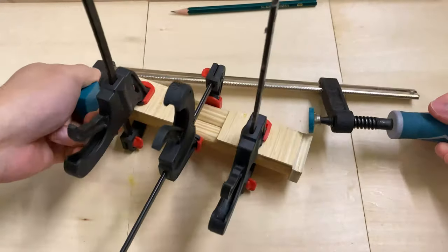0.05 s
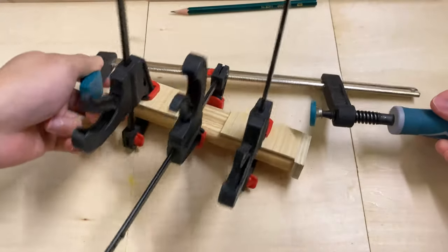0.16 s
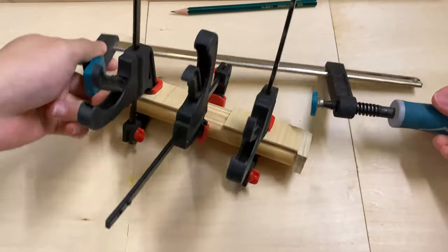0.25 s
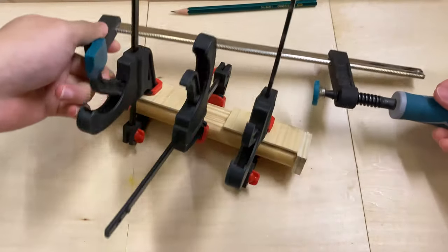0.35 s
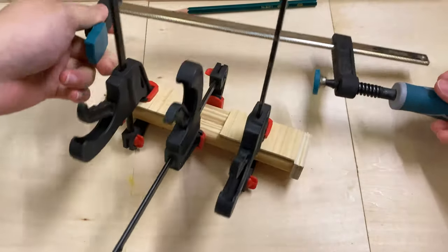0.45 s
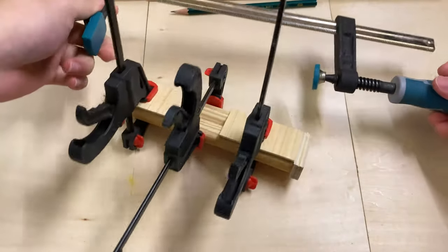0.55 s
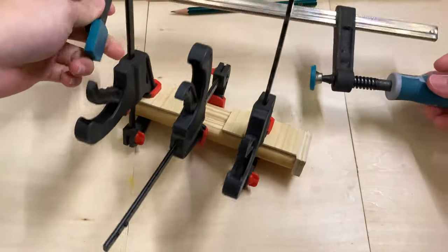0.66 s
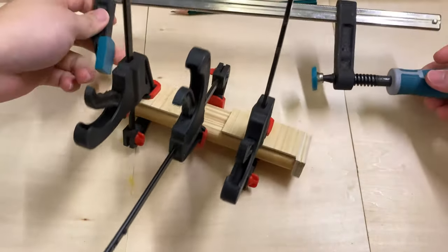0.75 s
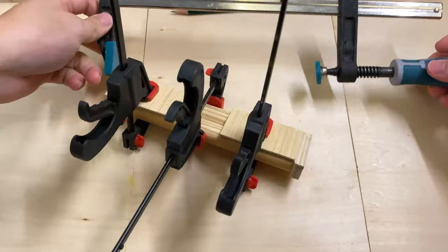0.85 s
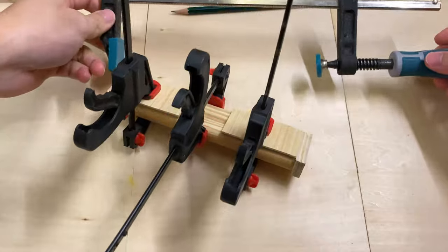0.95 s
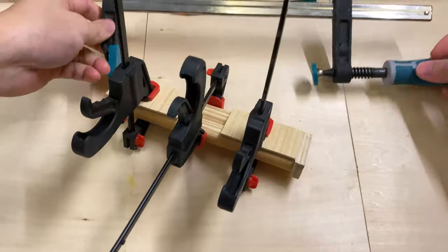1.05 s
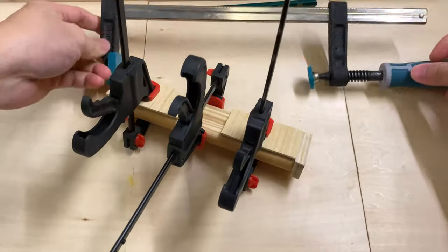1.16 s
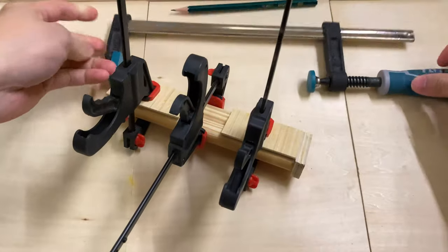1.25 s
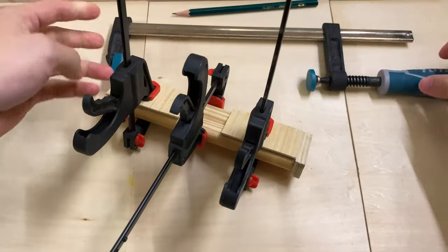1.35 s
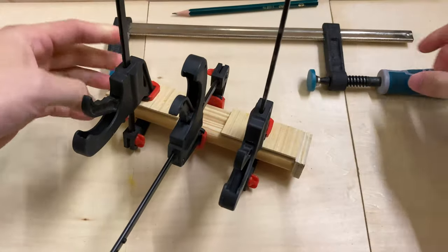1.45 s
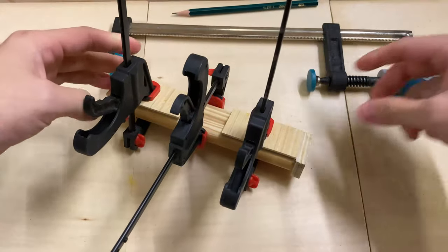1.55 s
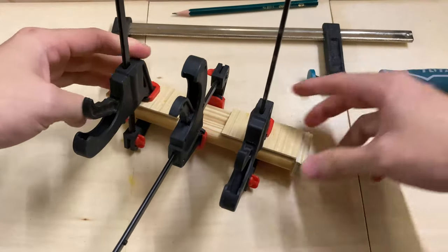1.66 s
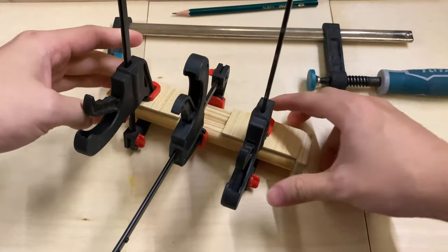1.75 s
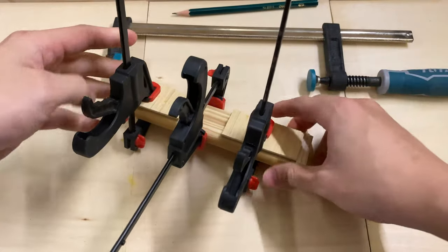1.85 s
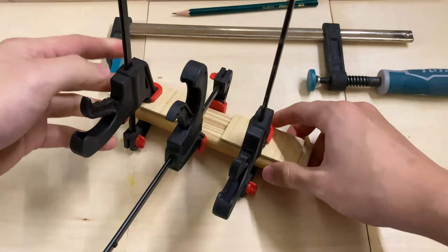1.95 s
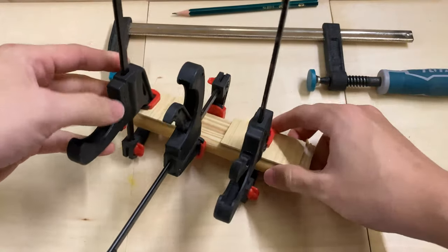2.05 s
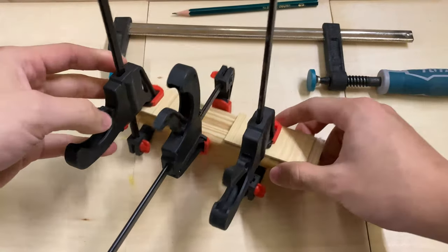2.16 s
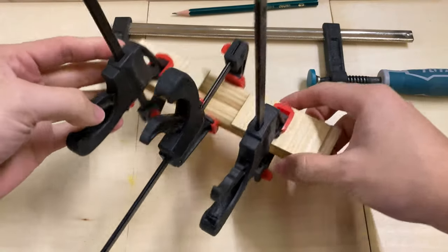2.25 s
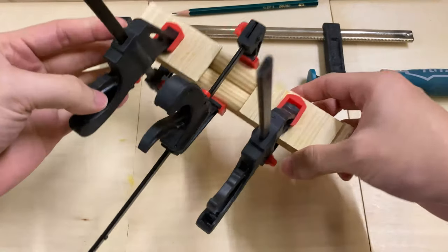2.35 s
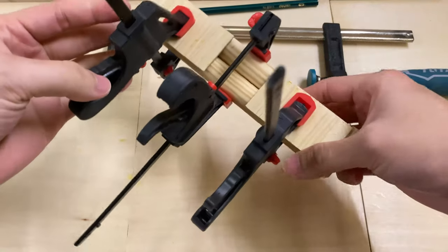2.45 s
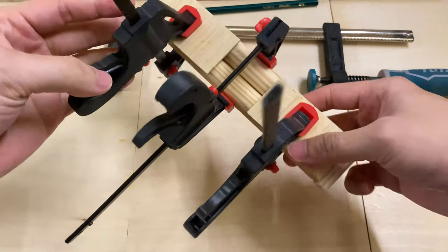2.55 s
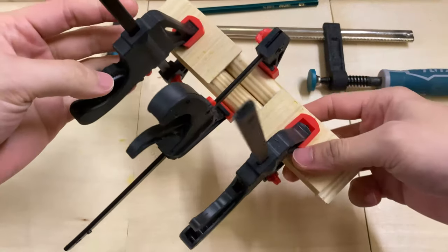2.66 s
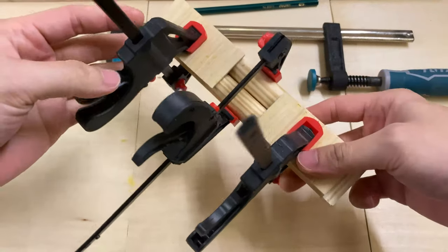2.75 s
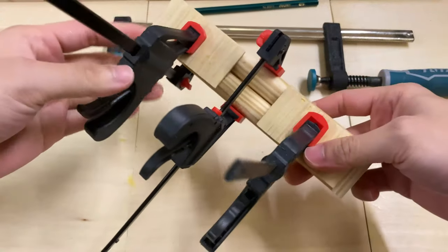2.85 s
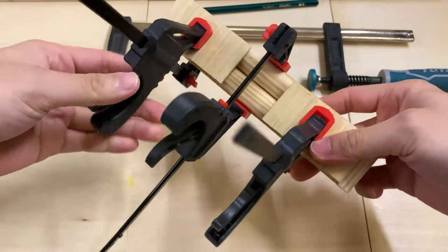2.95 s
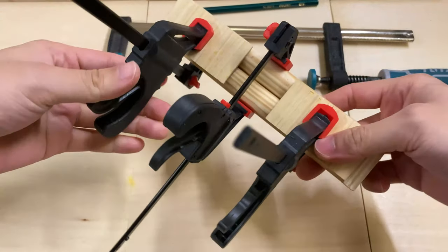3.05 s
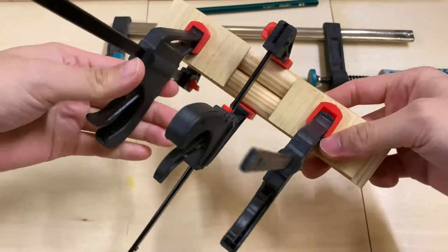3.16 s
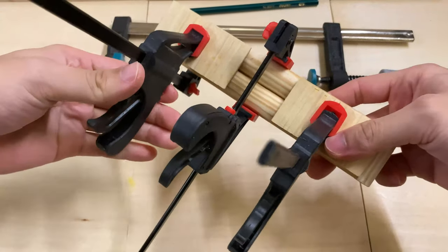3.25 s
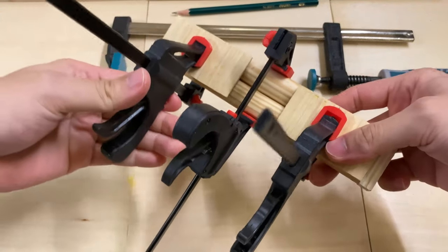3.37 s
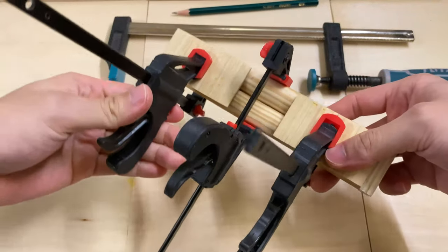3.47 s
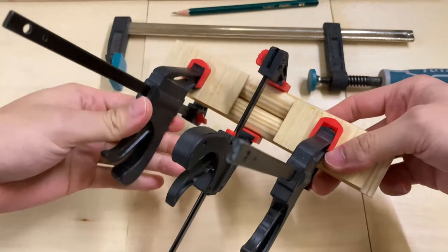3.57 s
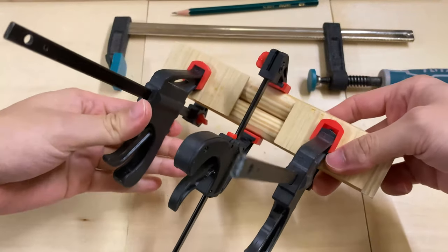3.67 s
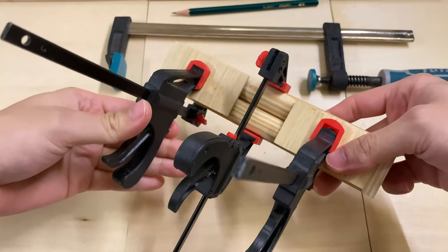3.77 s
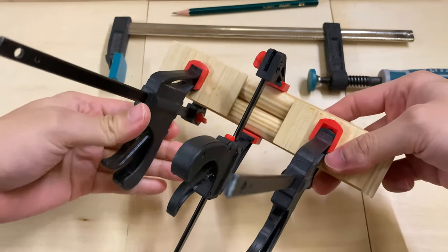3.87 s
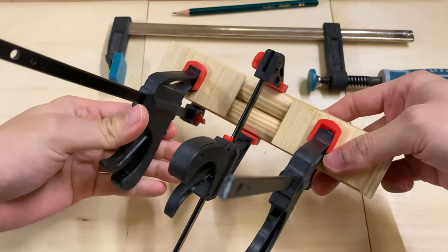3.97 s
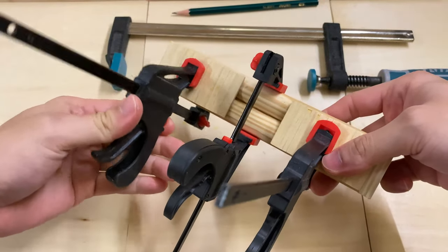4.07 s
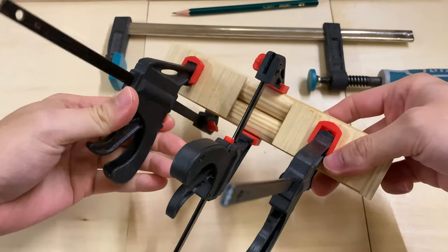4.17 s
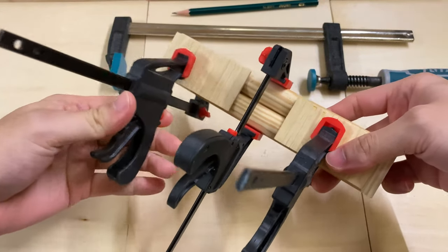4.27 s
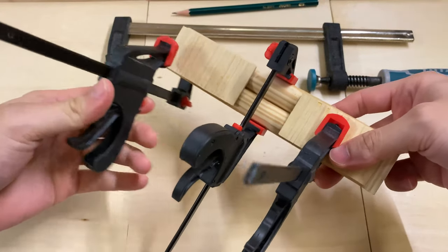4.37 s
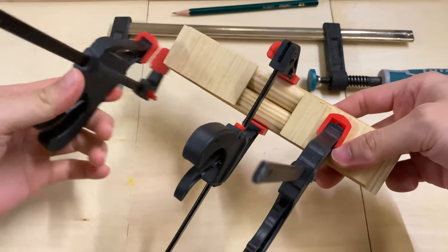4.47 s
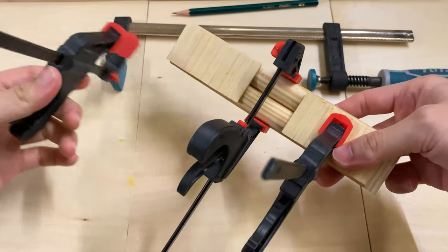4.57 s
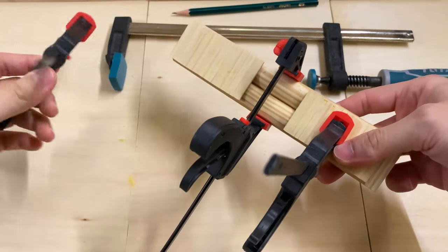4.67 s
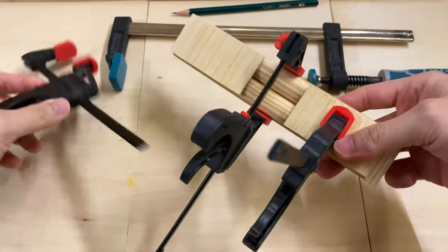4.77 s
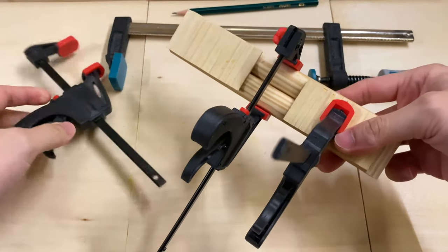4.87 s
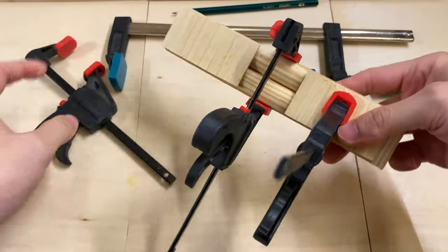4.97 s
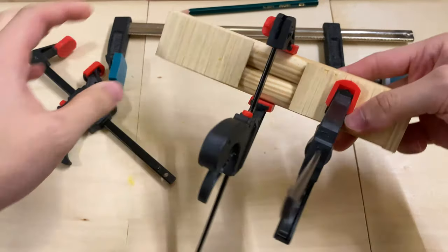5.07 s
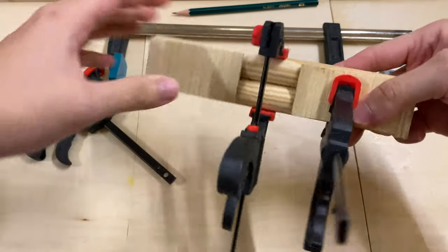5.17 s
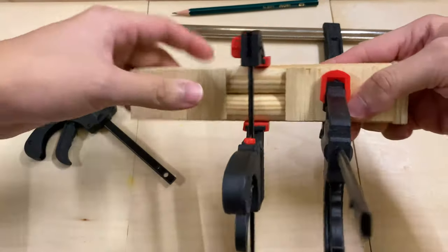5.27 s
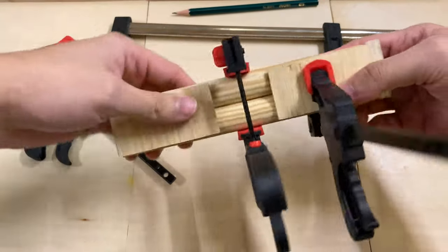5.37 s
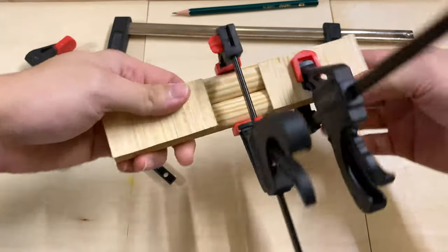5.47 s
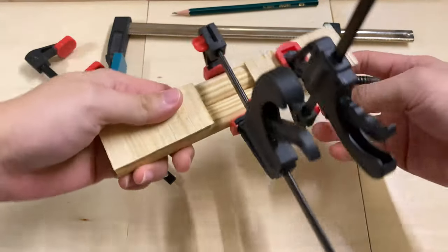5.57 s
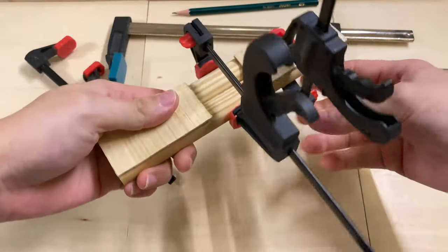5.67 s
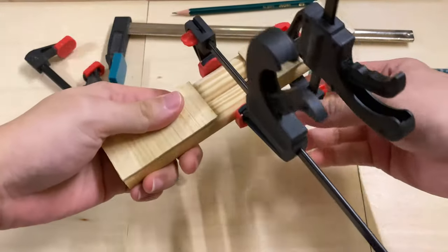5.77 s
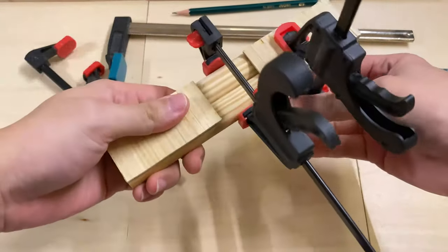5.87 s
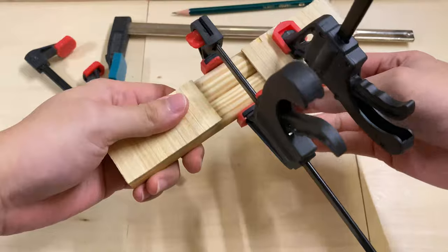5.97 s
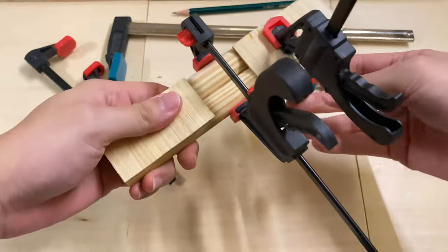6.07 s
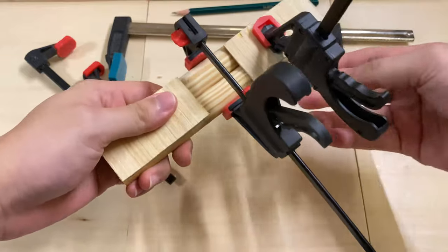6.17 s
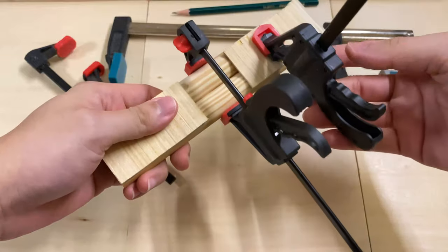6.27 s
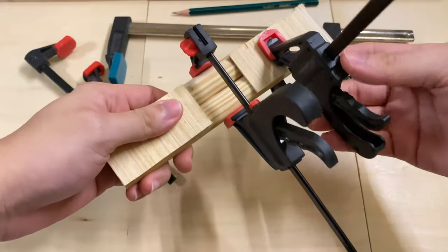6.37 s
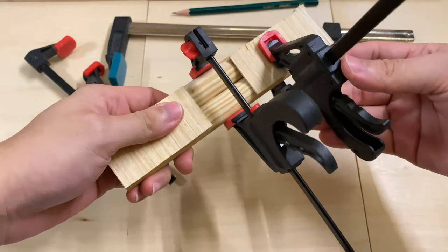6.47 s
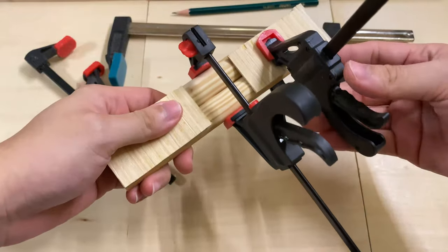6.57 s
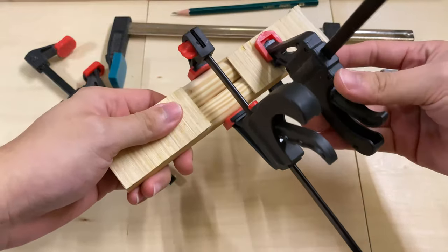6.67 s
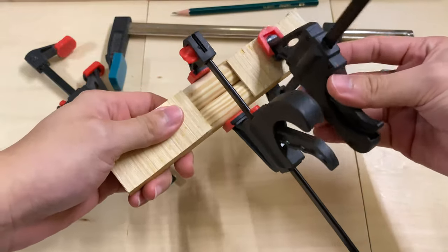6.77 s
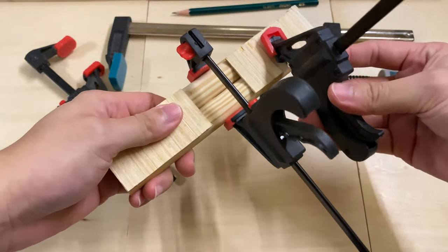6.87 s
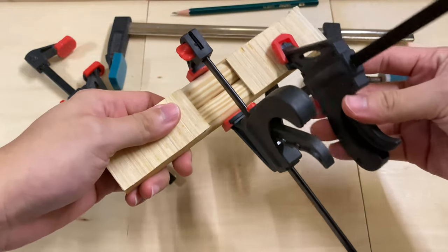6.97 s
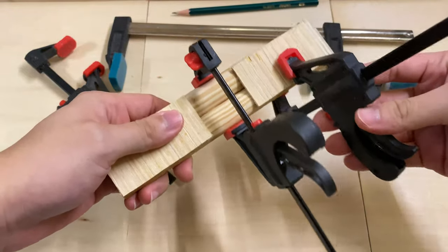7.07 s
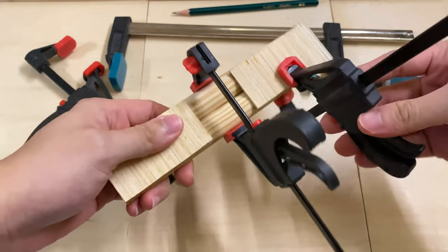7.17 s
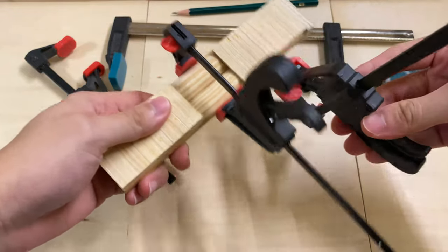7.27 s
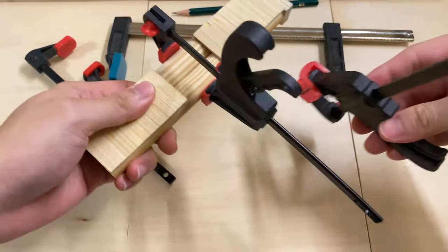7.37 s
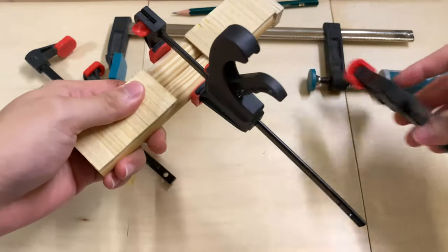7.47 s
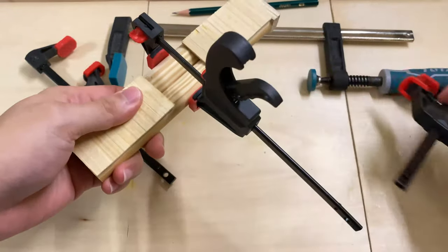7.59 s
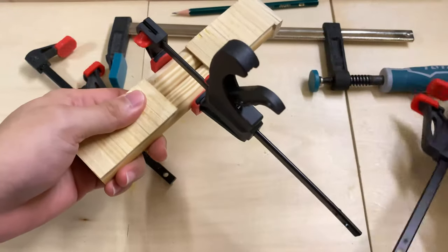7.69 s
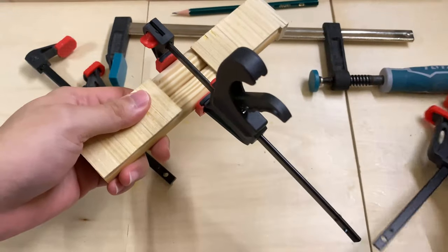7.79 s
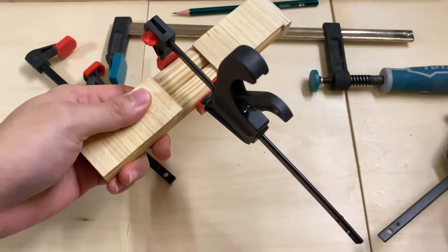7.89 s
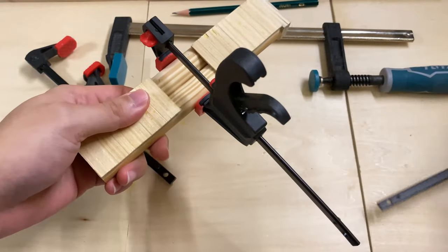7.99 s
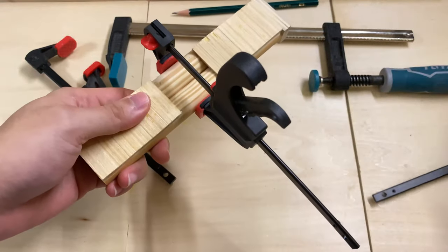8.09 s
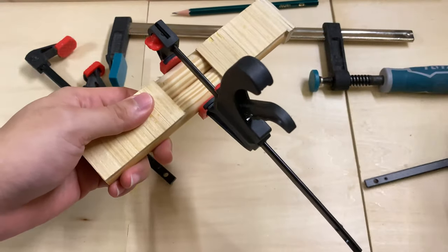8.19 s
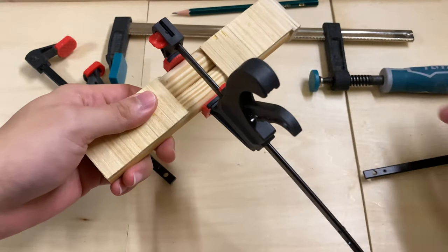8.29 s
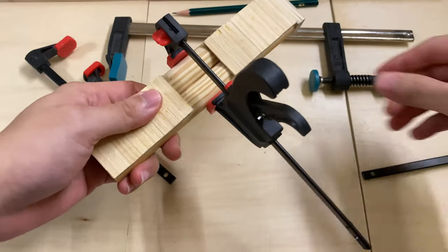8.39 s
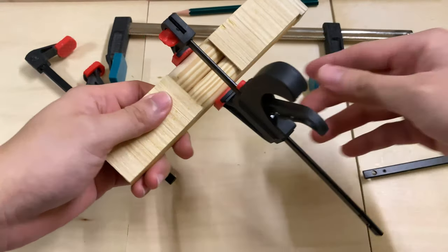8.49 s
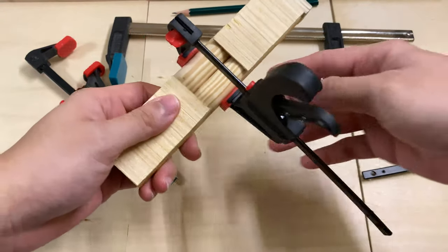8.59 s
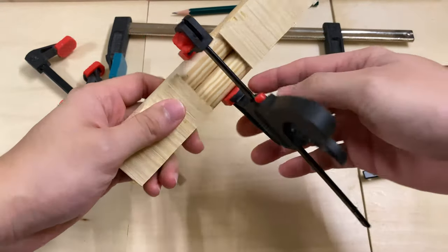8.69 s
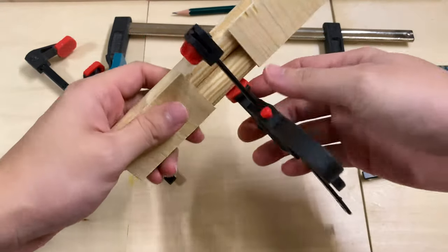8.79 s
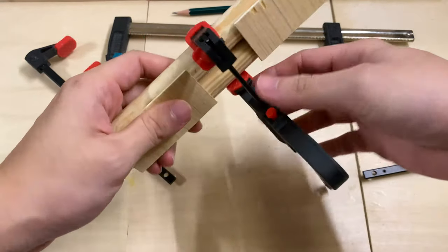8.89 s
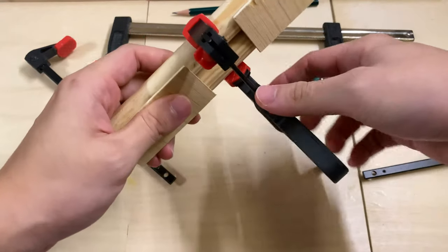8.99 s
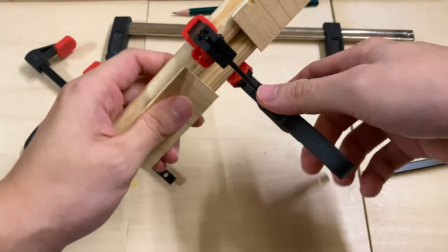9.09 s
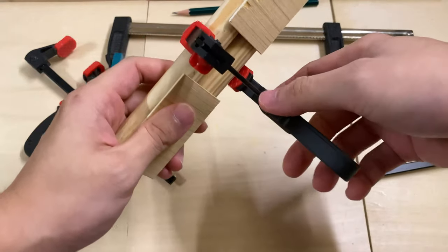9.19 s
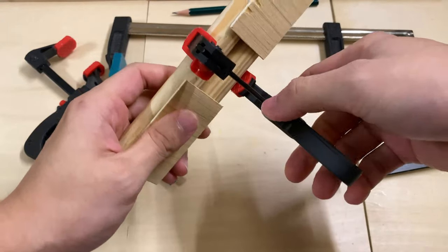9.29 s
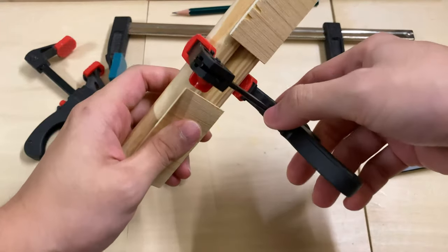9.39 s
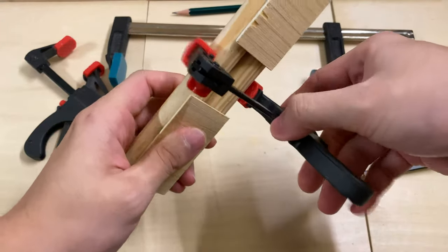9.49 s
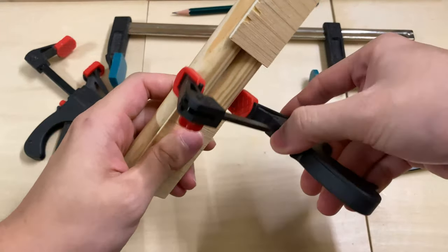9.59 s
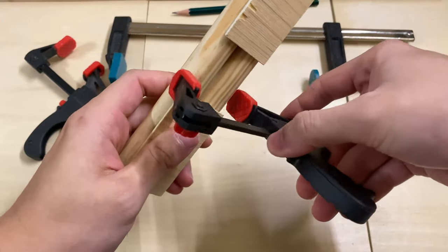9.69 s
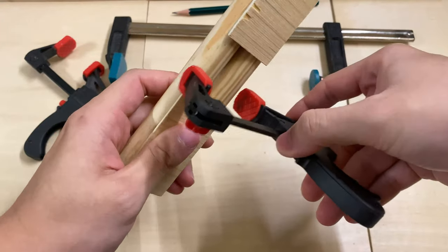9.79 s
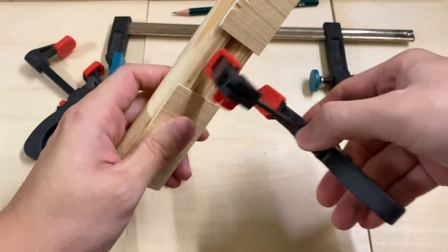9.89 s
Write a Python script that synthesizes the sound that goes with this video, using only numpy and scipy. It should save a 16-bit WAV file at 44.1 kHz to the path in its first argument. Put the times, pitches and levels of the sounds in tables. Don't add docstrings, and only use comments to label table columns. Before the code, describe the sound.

Plastic bar clamps click, creak and clatter onto a wooden bench, a steel bar rings briefly, with faint finger rubbing in a quiet small workshop.

```python
import sys
import numpy as np
from scipy import signal
from scipy.fft import rfft, irfft, next_fast_len
from scipy.io import wavfile

SR = 44100
rng = np.random.default_rng(int(sys.argv[2]) if len(sys.argv) > 2 else 0)


def master_out(mix):
    frames = np.transpose(np.atleast_2d(mix))
    ceiling = np.clip(frames, -1, 1)
    pcm = np.round(ceiling * 32767).astype(np.int16)
    wavfile.write(sys.argv[1], SR, pcm)


def convert_level_to_amplitude(level_db):
    exponent = np.asarray(level_db, float) / 20
    return 10 ** exponent


N = 438354
TIME = np.arange(N) / SR
SIZE = next_fast_len(N + SR)
BINS = np.arange(SIZE // 2 + 1) * SR / SIZE + .01
HIT = 4000

# (multiple of the pitch [-], level [dB], t60 [s])
SHELL_MODES = [(.55, -10, .008), (.7, -8, .010), (.84, -5, .013), (1.0, 0, .020), (1.2, -5, .011),
               (1.45, -7, .006)]
# (frequency [Hz], level [dB], t60 [s])
RIB_MODES = [(3630, -1.5, 0.0053), (4170, -4.5, 0.01), (4900, 1.5, 0.0074), (5728, -3, .007),
             (6580, -3, 0.0071), (7600, -4, 0.002)]


def rms_one(x):
    return x / np.sqrt(np.mean(x ** 2) + 1e-30)


def at_hz(points, hz, order=1):
    points = np.array(points)
    return np.interp(np.log(hz), np.log(points[:, 0]), points[:, order])


def shaped(x, response):
    return irfft(rfft(x, SIZE) * response, SIZE)[..., :N]


def band_pass(order, low_hz, high_hz, x):
    return signal.sosfilt(signal.butter(order, [low_hz, high_hz], "band", fs=SR, output="sos"), x)


def drift(rate):
    return rms_one(shaped(rng.standard_normal(N), 1 / (1 + (BINS / rate) ** 2)))


def tone(hz, width):
    return rms_one(shaped(rng.standard_normal(N), 1 / (1 + (2 * (BINS - hz) / width) ** 2)))


def stroke(t, start_s, hold_s, rise_db_per_s, fall_db_per_s):
    early, late = np.maximum(start_s - t, 0), np.maximum(t - start_s - hold_s, 0)
    return convert_level_to_amplitude(-rise_db_per_s * early - fall_db_per_s * late)


def ring(push, hz, t60):
    r, w = convert_level_to_amplitude(-60 / (t60 * SR)), 2 * np.pi * hz / SR
    return signal.lfilter([0, np.sin(w)], [1, -2 * r * np.cos(w), r * r], push + 1e-18)


def struck(push, modes, luck):
    spread_db = 1.2 * (luck[:, :1] + .6 * luck[:, 1:])
    out = 0
    for k, (hz, db, t60) in enumerate(modes):
        out = out + ring(push, hz, t60) * convert_level_to_amplitude(db + spread_db[k, :, None]) * (-1) ** k
    return out / np.abs(out).max(axis=1, keepdims=True)


def blurred(low_hz, high_hz):
    click = band_pass(3, low_hz, high_hz, np.arange(HIT) == 0)
    return click / np.abs(click).max()


def air(spectrum, patchy_db):
    # (frequency [Hz], left-right likeness [-])
    likeness = [(60, 1), (130, 0.085), (290, 0.074), (640, -0.6), (1410, 0.097), (3100, -0.24),
                (6820, 0.46), (15000, -1.7)]
    alike = np.clip(at_hz(likeness, BINS), -.99, .99)
    colour = convert_level_to_amplitude(at_hz(spectrum, BINS))
    mid, side = shaped(rng.standard_normal((2, N)), colour * np.sqrt([1 + alike, 1 - alike]))
    return rms_one(mid + side * [[1], [-1]]) * convert_level_to_amplitude(patchy_db * drift(9))


def room_tone():
    # (frequency [Hz], density [dB per Hz])
    air_colour = [(55, 0.5), (120, -9), (340, -15.5), (726, -12), (2330, -22.5), (2900, -28.5), (6550, -50),
                  (16500, -65.5)]
    return convert_level_to_amplitude(-53) * air(air_colour, patchy_db=1.0) * convert_level_to_amplitude([[-.9], [.9]])


def hum():
    # (frequency [Hz], width [Hz], level [dB])
    hum_tones = [(104.6, 28, -63), (171.1, 35, -65.5), (208.5, 13, -70), (284, 41, -65)]
    drone = sum(convert_level_to_amplitude(db) * tone(hz, width) for hz, width, db in hum_tones)
    whine = np.sin(2 * np.pi * 2300 * TIME + 1.0 * drift(4.4)) * convert_level_to_amplitude(1.5 * drift(18))
    start_up = np.clip((TIME - 4.13) / 0.3, 0, 1)
    return (drone + convert_level_to_amplitude(-71.5) * whine * start_up) * convert_level_to_amplitude([[-.8], [.8]])


def walls(x):
    # (frequency [Hz], t60 [s], level [dB])
    wall_decay = [(150, 0.4, -41), (500, 0.2, -46), (1500, 0.17, -44), (3000, 0.16, -44), (6000, 0.12, -43),
                  (11000, 0.074, -41), (16000, .09, -41.5)]
    late_db, late_stretch = -6, 2.5
    t, tail = np.arange(SR // 2) / SR, 0
    edges = 90 * 2 ** np.arange(0, 7.6, .5)
    for low, high in zip(edges, edges[1:]):
        band = band_pass(2, low, high, rng.standard_normal((2, len(t))))
        hz = np.sqrt(low * high)
        fall_db = 60 * t / at_hz(wall_decay, hz)
        decay = convert_level_to_amplitude(-fall_db) + convert_level_to_amplitude(late_db - fall_db / late_stretch)
        tail = tail + band * convert_level_to_amplitude(at_hz(wall_decay, hz, order=2)) * decay
    first_echoes = np.clip(t / 0.0048, 0, 1)
    return shaped(x, rfft(tail * first_echoes, SIZE))


def shake():
    # (time [s], level [dB])
    rumble_levels = [(0.5, -60), (0.53, -45), (0.576, -42), (0.72, -43), (0.82, -55), (0.87, -65),
                     (0.95, -57), (1.06, -72)]
    # (time [s], peak [dB], pitch [Hz], swell and fade [cycles])
    jolts = [(.528, -48, 100, .5), (0.554, -37.5, 170, 0.9), (.581, -31, 80, 0.69), (.622, -42, 65, 0.58),
             (.646, -33.5, 110, 0.79), (.678, -39, 120, 0.62), (.721, -30, 84.5, 0.62),
             (.785, -37, 70, 0.7), (.815, -42, 60, .5), (.945, -45, 55, .6), (.99, -43, 55.25, 0.48),
             (7.7344, -41, 1030, 2.5), (7.739, -34, 328, 1.1)]
    times, levels_db = np.transpose(rumble_levels)
    swell = convert_level_to_amplitude(np.interp(TIME, times, levels_db, -150, -150))
    bass_band = 1 / (1 + (BINS / 130) ** 4) / (1 + (45 / BINS) ** 4)
    out = swell * rms_one(shaped(rng.standard_normal(N), bass_band))
    for s, db, hz, cycles in jolts:
        turns = (TIME[:SR * 8] - s) * hz
        out[:SR * 8] += convert_level_to_amplitude(db) * np.cos(2 * np.pi * turns + 3.1) * np.exp(-(turns / cycles) ** 2)
    return shaped(out, np.exp(1j * np.array([[-.7], [.7]])) + 0 * BINS)


def skin():
    # (time [s], hold [s], rub [dB], fine
    # hiss [dB])
    rub_swells = [(0.02, 0.15, -72, -90), (0.616, 0.15, -68.5, -105), (1.184, 0.14, -67, -94.5),
                  (1.45, .15, -66, -97), (1.811, 0.033, -69.5, -88), (1.936, 0.14, -67.5, -86),
                  (2.199, 0.35, -73.5, -90.5), (2.551, 0.3, -72.5, -88), (3.143, 0.15, -71.5, -113),
                  (4.103, 0.1, -64, -91), (4.516, 0.042, -71, -91), (5.1, 0.13, -67, -100),
                  (5.403, 0.22, -67, -83), (5.949, 0.11, -71.5, -100), (6.785, 0.06, -76, -80),
                  (6.87, 0.12, -72, -103), (7.048, 0.16, -79, -99), (7.294, 0.041, -71, -85),
                  (7.7, 0.69, -72.5, -100.5), (8.25, 0.1, -68, -103), (8.999, .05, -72, -86),
                  (9.7, 0.26, -73.5, -92.5)]
    # (frequency [Hz], density [dB per Hz])
    rub_colour = [(1800, -25.5), (3000, 1), (5500, -1), (6800, -0.5), (9000, -3.5), (12000, -12),
                  (13500, -15.5), (14500, -42)]
    # (frequency [Hz], density [dB per Hz])
    hiss_colour = [(11000, -40), (12500, -2.5), (14000, 1.5), (15800, -3), (16600, -24.5)]
    fade_db_per_s, grip_db = 129.5, -75.5
    t = TIME[::100]
    shapes = np.array([stroke(t, s, hold_s, fade_db_per_s, fade_db_per_s) for s, hold_s, *_ in rub_swells])
    gains = convert_level_to_amplitude(np.array(rub_swells)[:, 2:]).T @ shapes
    rub, hiss = (np.interp(TIME, t, gain) for gain in gains)
    rub = np.maximum(rub, convert_level_to_amplitude(grip_db))
    rubbing = rub * air(rub_colour, patchy_db=0.9) * convert_level_to_amplitude(1.1 * drift(45))
    return rubbing + hiss * convert_level_to_amplitude(8.5) * air(hiss_colour, patchy_db=2.5)


def drags():
    # (time [s], hold [s], level [dB], brightness [dB], shell pitch [Hz])
    caught = [(1.873, 0.034, -40, -5, 2570), (1.955, 0.027, -49.5, -12, 2240),
              (4.545, 0.0073, -51, -31, 1510), (7.9, 0.12, -56.5, -23, 1750), (8.034, .078, -51, -30, 2020),
              (6.975, 0.052, -53, -12, 2080)]
    # (time [s], hold [s], level [dB], brightness [dB], shell pitch [Hz])
    lifted = [(0.00091, 0.0017, -47, -43, 2150), (0.088, 0.0045, -54.5, -11, 2100),
              (4.5, 0.0036, -59, -12, 1460), (6.965, .025, -55, -28, 1200), (1.343, .03, -42, 3, 2800),
              (4.93, .02, -45, -6, 2040), (6.78, .02, -56, 3, 1800), (0.2, 0.0073, -69, -3.5, 2200)]
    bite_db_per_s, catch_db_per_s, lift_db_per_s = 6000, 2503, 182
    out, size = np.zeros(N), SR // 4
    for rows, fall in ((caught, catch_db_per_s), (lifted, lift_db_per_s)):
        for s, hold_s, level_db, bright_db, pitch_hz in rows:
            at = max(int(s * SR) - 1000, 0)
            span = slice(at, at + size)
            slips = (rng.random(size) < 5000 / SR) * rng.standard_normal(size)
            slips = slips * convert_level_to_amplitude(1.2 * rng.exponential(1, size))
            slips = signal.sosfilt(signal.butter(4, pitch_hz * .55, "high", fs=SR, output="sos"), slips)
            low = rms_one(sum(ring(slips, pitch_hz * m, t60 * 0.22) * convert_level_to_amplitude(d) for m, d, t60 in SHELL_MODES))
            low = signal.sosfilt(signal.butter(4, pitch_hz * 1.3, fs=SR, output="sos"), low)
            high = sum(ring(slips, hz, t60 * .4) * convert_level_to_amplitude(d) for hz, d, t60 in RIB_MODES)
            high = rms_one(high + .8 * np.diff(slips, prepend=0))
            gain = convert_level_to_amplitude(level_db) * stroke(TIME[span], s, hold_s, bite_db_per_s, fall)
            out[span] += gain * (low + high * convert_level_to_amplitude(bright_db))
    return out


def steel():
    # (frequency [Hz], level [dB], t60 [s])
    bar_modes = [(4716, -14, .15), (5809, -20, .2), (6460, -2, 0.064), (6580, -23.5, .8), (6620, -5, 0.097),
                 (8250, -25, 0.47), (9800, -27, .4), (10270, -10, .13), (10540, -12.5, .08),
                 (11330, -6, 0.037), (11500, -10, .08), (11700, -29, .33), (15400, -16, .1),
                 (15650, -18, .1)]
    # (time [s], level [dB])
    blows = [
        (1.3306, -36),
        (1.337, -26),
        (1.339, -29),
        (1.341, -28.5),
        (1.347, -41.5),
        (1.363, -33),
        (1.402, -38.5),
        (1.416, -34),
        (1.574, -63.5),
    ]
    out = np.zeros((2, N))
    times, blows_db = np.transpose(blows)
    at = [round((s - 1) * SR) for s in times]
    for hz, level_db, t60 in bar_modes:
        clicks = np.zeros((2, SR))
        clicks[:, at] = convert_level_to_amplitude(blows_db + level_db + 2 * rng.standard_normal((2, len(at))))
        out[:, SR:2 * SR] += ring(clicks, hz, t60)
    out = out * (1 + convert_level_to_amplitude(10.5) * stroke(TIME, 1.3368, 0.0076, 30000, 30000))
    return out * convert_level_to_amplitude(4 * drift(130))


def plastic_hit(hz, ribs_db, thud_db, snap_db, snap_hz, shell_more_db, ribs_more_db):
    # (frequency [Hz], level [dB], t60 [s])
    bench_modes = [(176, -2, 0.021), (312, 3.5, 0.017), (447.3, -2.5, 0.041), (682, -3.5, 0.047)]
    t = np.arange(HIT) / SR
    luck, grit = rng.standard_normal((3, 6, 3)), rng.standard_normal((3, HIT))
    chatter = (grit[0] + .6 * grit[1:]) * (np.exp(-t / .0012) + .12 * np.exp(-t / .008))
    stiff = signal.butter(2, 500, "high", fs=SR, output="sos")
    contact = signal.sosfilt(stiff, (t == 0) + .15 * chatter)
    shell_modes = [(hz * m, db + more, t60 * .7) for (m, db, t60), more in zip(SHELL_MODES, shell_more_db)]
    rib_modes = [(f, db + more, t60) for (f, db, t60), more in zip(RIB_MODES, ribs_more_db)]
    shell = struck(contact, shell_modes, luck[0])
    ribs = struck(contact, rib_modes, luck[1])
    thud = struck(t * np.exp(-t / 0.000047), bench_modes, luck[2])
    crack = band_pass(3, hz * .74, hz * 1.35, chatter)
    snap = band_pass(2, *snap_hz, grit[0] * np.sqrt(t) * np.exp(-t / .0011))
    hit = shell + convert_level_to_amplitude(0.5) * crack / np.abs(crack).max()
    hit = hit + convert_level_to_amplitude(ribs_db + 2.5) * ribs + convert_level_to_amplitude(thud_db + 1.5) * thud
    return hit + convert_level_to_amplitude(ribs_db + snap_db + 4.0) * snap / np.abs(snap).max()


def radiated_hit(hz, ribs_db, thud_db, snap_db, snap_hz):
    body = blurred(hz * .7, hz * 1.4) + convert_level_to_amplitude(ribs_db + 4.5) * blurred(3300, 7000)
    return body + convert_level_to_amplitude(ribs_db + snap_db + 5.0) * blurred(*snap_hz) + convert_level_to_amplitude(thud_db - 2.0) * blurred(180, 700)


def knocks():
    # (time [s], peak [dB], shell pitch [Hz], brightness [dB], bench thud [dB])
    bar_moved = [(0.003, -40.5, 1630, 3.5, 3), (0.242, -21.5, 2200, -6.5, -9.5),
                 (0.519, -22.5, 1710, -21, -5.5), (0.688, -29.5, 2200, -33, -8),
                 (0.702, -27.5, 2200, -13.5, -18), (0.872, -28, 2080, -31, -2.5),
                 (0.983, -41.5, 1600, -14, 3), (1.09, -33, 1500, -28, -3.5), (1.176, -23.5, 1860, -3, -4),
                 (1.177, -22, 760, -21, -8.5), (1.19, -45, 1800, 3.5, -6.5), (1.204, -42, 1821, 9, -8),
                 (1.227, -44.5, 1034, -11.5, 0.5)]
    rebounds = [
        (0.259, -26, 2240, -8, -22),
        (.535, -30, 2210, -11, -9),
        (0.888, -38, 2000, -18, -14),
        (1, -50, 2206, -13, -5),
    ]
    bar_down = [(1.304, -30.5, 1968, -21, -23), (1.315, -26.5, 1850, 0.5, -21),
                (1.323, -28.5, 1900, -4, -15), (1.329, -0.5, 1746, -10.5, -16),
                (1.3328, 0.2, 2050, -5.5, -44), (1.3368, -12.5, 1860, 4, -21.5),
                (1.339, -24, 2316, 5.5, -12.5), (1.343, -19.5, 1670, 5, -14.5),
                (1.35, -25, 2380, -0.5, -19), (1.366, -34.5, 3055, 11, -7), (1.3996, -10, 2204, -8, -19.5),
                (1.403, -17, 2307, -2.5, -16), (1.407, -21, 1651, -9, -19), (1.413, -25, 2600, 3.5, -17),
                (1.418, -29.5, 2420, 6, -21), (1.435, -30, 3180, 0, -14), (1.785, -35, 2300, -11.5, -5.5),
                (2.022, -47, 4760, -19, -29)]
    first_clamp = [(2.773, -57.5, 1057, 5.5, -7), (4.189, -47.5, 2130, 12, -14),
                   (4.425, -30.5, 1350, -12, -11), (4.441, -49, 900, 2, 2.5),
                   (4.875, -10.5, 1672, 7.5, -30), (4.9, -26.5, 1790, -2, 1.5), (4.906, -7.5, 2300, 4, -30),
                   (4.909, -11.5, 3000, -16, -29.5), (4.9213, -7.5, 2727, -2.5, -26),
                   (4.9233, -6.5, 1994, 0.5, -20), (4.931, -22, 2300, 0, -15), (4.978, -12, 2300, -3, -25),
                   (4.98, -14.5, 1840, -2, -25), (4.983, -19, 1500, -4.5, -9), (5.0099, -4, 3300, 0, -24),
                   (5.0119, -9, 2410, 0.5, -22), (5.014, -17, 1220, 4, -31),
                   (5.0253, -11, 2180, 0.5, -15.5), (5.0277, -16.5, 1110, -10.5, -11),
                   (5.033, -22.5, 1550, -17, -7.5), (5.067, -26.5, 1990, -6, -14.5)]
    releases = [(6.309, -42, 1245, -9, -2.5), (6.807, -26, 1900, 0, -20), (6.811, -23.5, 1890, 3.5, -29),
                (6.836, -26, 1770, -6, -11.5), (6.959, -27.5, 1017, -7.5, -16),
                (7.334, -61.5, 1094, 18, -12), (9.018, -32.5, 1800, -6, -6), (9.139, -50.5, 1410, 1, -8),
                (9.579, -33, 1890, -10, -17)]
    second_clamp = [(7.655, -35.5, 1810, -1, -16), (7.659, -45, 2700, 6.5, -15),
                    (7.678, -41.5, 907, -0.5, -17), (7.705, -43.5, 1680, 11, -2),
                    (7.803, -62, 2420, 10, -20), (7.816, -52.5, 2440, 10.5, -22),
                    (7.8528, -7.5, 1607, -30, -60), (7.8607, -5, 1607, -16, -84),
                    (7.863, -24, 2100, -8, -60), (7.868, -20, 1600, -29.5, -43.5),
                    (7.875, -21, 1650, -31.5, -28), (8.033, -39, 2420, -25.5, -4.5),
                    (8.131, -41, 1970, -19, -2.5), (8.149, -20, 1550, -7, -28),
                    (8.1524, -18, 1720, -4.5, -29.5), (8.156, -19, 1800, -13, -14.5),
                    (8.1665, -8.5, 1500, -12.5, -27), (8.1733, -8, 2243, -4, -16),
                    (8.175, -1, 2330, -2.5, -48)]
    triggers = [
        (4.098, -17.5, 2220, 1, -21),
        (4.101, -21.5, 1500, -5, -12.5),
        (6.7756, -16, 1500, 0, -15.5),
        (9.568, -19, 1710, -1.5, -13.5),
    ]
    touches = [(.545, -37.5, 800, -23, 0), (6.768, -42, 4700, -1, -30), (6.803, -40.5, 900, -22, -14),
               (6.843, -44, 2610, 2, -22), (6.976, -35.5, 1100, -20, -15), (7.013, -45, 1200, -12, -15),
               (8.322, -43, 2300, -21.5, -24.5)]
    groups = (bar_moved, rebounds, bar_down, first_clamp[:11], first_clamp[11:], releases,
              second_clamp[:6], second_clamp[6:11], second_clamp[11:],
              triggers[:2], triggers[2:3], triggers[3:], touches)
    # (left-right [dB], snap re ribs [dB], snap from [Hz], snap to [Hz])
    places = [(0.5, -9.5, 6300, 18000), (-1.5, -19, 7400, 14000), (-3, -5, 10000, 13000),
              (2, -13.5, 6300, 13000), (3, -10, 6300, 14000), (-0.5, -13.5, 6800, 9700),
              (-2, -6.5, 6900, 14000), (-7.5, -14, 6000, 14000), (-3.5, -8, 6300, 14000),
              (-1, 3.5, 6800, 15500), (-3.5, 3.5, 6400, 13500), (-0.9, 1.5, 9400, 15000),
              (-5, -16, 6300, 12000)]
    shell_by_group = [(8, 7, 0.2, 0.3, -8, 0.5), (-12, -6, 2, 6, -13, -18),
                      (-4.5, -1, -1.34, 0.5, -0.83, -8.5), (2.5, -1.5, -3, -2.5, -0.5, 3.5),
                      (2, -1.15, -3, -4, -2, 3.5), (1, 2, 3, 10.5, 1, 10), (-11, -7, 0.5, 1.5, -5, 1.5),
                      (-2, -12, -3, -0.3, -2, 0.1), (-5.5, -3, -2.5, 2.3, -6.5, -1.5),
                      (-8, -3, -7, 2, -2, 4), (-7, -3, 5.5, -3.5, -4.5, 9), (-19, -11, 2, 4, 1.5, 0),
                      (-6, -1, 4, 4, 2, -2)]
    ribs_by_group = [(11, 8.5, 2.5, -5, 7, -13), (-6, 8, -4.5, -8, -10, -8), (0.5, -5.5, -4, -3, 4, -0.5),
                     (-8, -5, 4, 2, 0.5, -6), (3, 4, -0.1, -0.7, 1.5, -1.5), (4, 3.5, 0, -3, 3.5, 5),
                     (2.5, 0, -0.5, 0.5, 5, -3), (3, 6, -4, -2.5, 4.5, -2),
                     (2.4, -4, -0.7, -1.9, 0.5, -1.5), (2, -1, -1, 2, 7, -3), (-3, 1.5, 4, -1, 3.5, 13.5),
                     (5, 4.5, 0.5, 0, 8, -3), (0.5, 0.1, 2, -4, 0.1, 0.5)]
    to_walls_db = [0.1, -2.2, -3.5, -0.2, 2.6, -3, 3, -2.1, -0.5, -1, -0.7, -2.5, 7]
    out = np.zeros((3, N + HIT))
    for rows, place, shell_more_db, ribs_more_db, wet_db in zip(groups, places, shell_by_group,
                                                                ribs_by_group, to_walls_db):
        pan_db, snap_db, *snap_hz = place
        pan = convert_level_to_amplitude([[pan_db / 2], [-pan_db / 2]])
        for s, db, hz, ribs_db, thud_db in rows:
            span = slice(round(s * SR), round(s * SR) + HIT)
            hit = plastic_hit(hz, ribs_db, thud_db, snap_db, snap_hz, shell_more_db, ribs_more_db)
            out[:2, span] += convert_level_to_amplitude(db - 4.5) * hit * pan
            out[2, span] += convert_level_to_amplitude(db + wet_db) * radiated_hit(hz, ribs_db, thud_db, snap_db, snap_hz)
    return out[:, :N]


def scene():
    # (frequency [Hz], right port lags [rad])
    near_lag = [(100, 0), (400, .7), (750, 2.1), (1500, 1.5), (8000, 1.4)]
    *clacks, radiated = knocks()
    held = steel() + drags() * convert_level_to_amplitude([[1.2], [-1.2]])
    lag = at_hz(near_lag, BINS)
    direct = shaped(clacks + held, np.exp([0 * lag, -1j * lag]))
    return direct + walls(radiated + held[0]) + skin() + room_tone() + hum() + shake()


def band_limit(x):
    return signal.sosfilt(signal.butter(12, 16650, fs=SR, output="sos"), x)


def record(dry):
    # (frequency [Hz], right port leads [rad])
    port_lead = [(9200, -2.0), (10300, -.4), (11800, .3), (12400, 2.0), (13000, 3.1), (14200, 3.8),
                 (15200, 5.8), (16500, 7.2)]
    top = 1 / (1 + (port_lead[0][0] / BINS) ** 24)
    lead = np.interp(BINS, *np.transpose(port_lead))
    right = shaped(dry[1], np.sqrt(1 - top)) + shaped(dry[0], np.sqrt(top) * np.exp(1j * lead))
    passband = 1 / (1 + (40 / BINS) ** 8) / (1 + (BINS / 15900) ** 40)
    both = shaped(np.array([dry[0], right]), passband)
    rounded = .97 * np.tanh(both / .97)
    return band_limit(rounded)


dry = scene()
out = record(dry)
master_out(out)
```